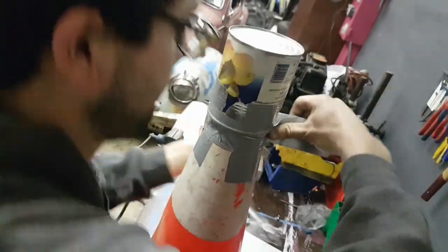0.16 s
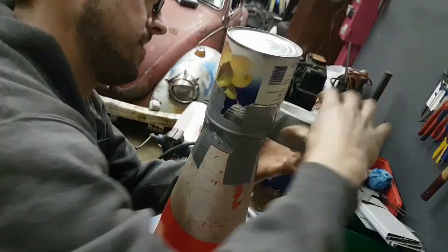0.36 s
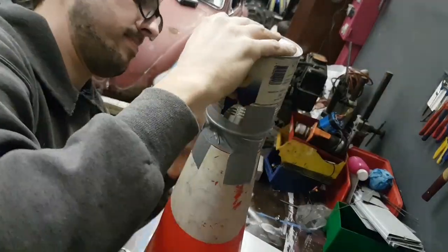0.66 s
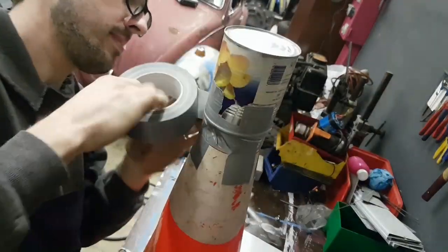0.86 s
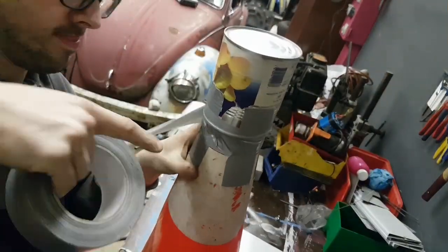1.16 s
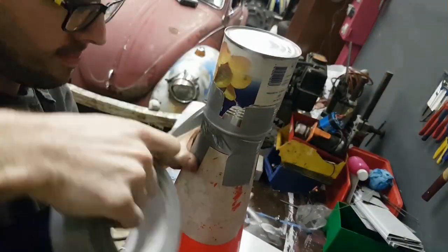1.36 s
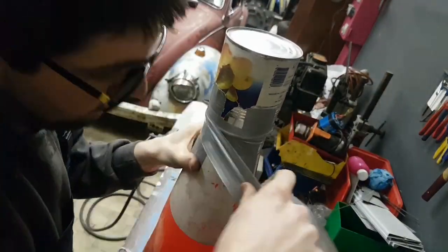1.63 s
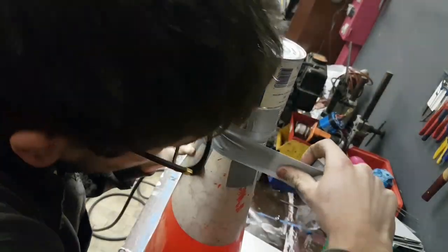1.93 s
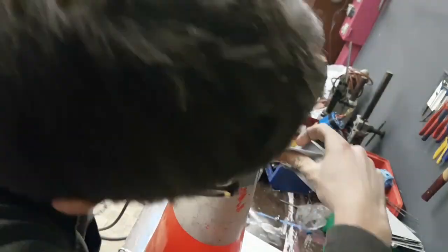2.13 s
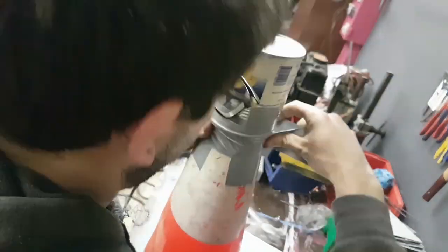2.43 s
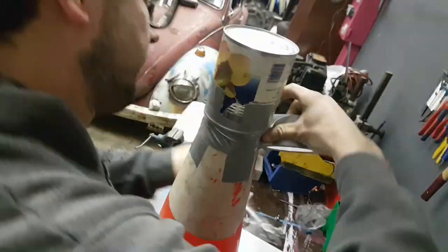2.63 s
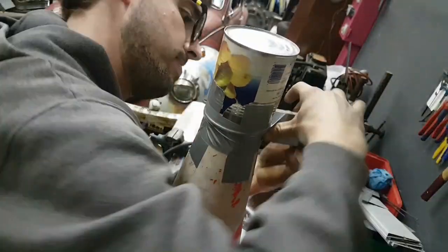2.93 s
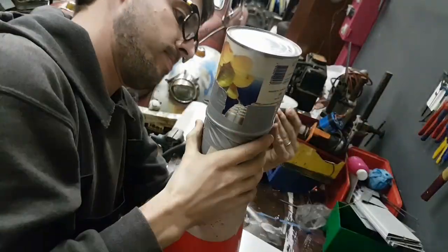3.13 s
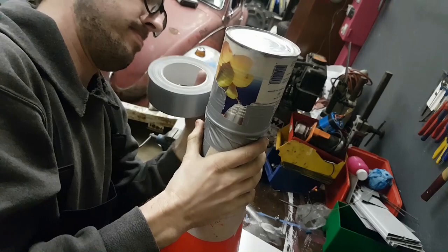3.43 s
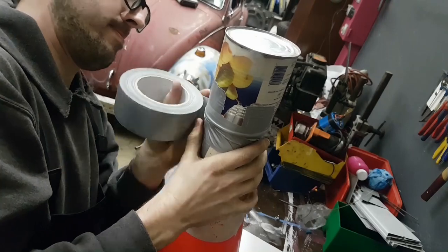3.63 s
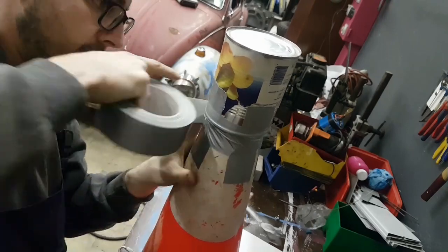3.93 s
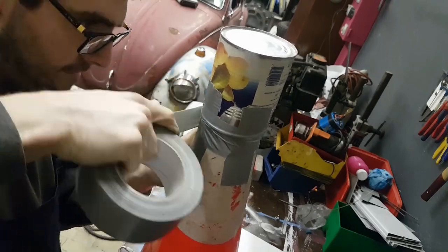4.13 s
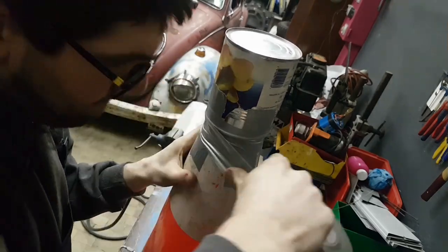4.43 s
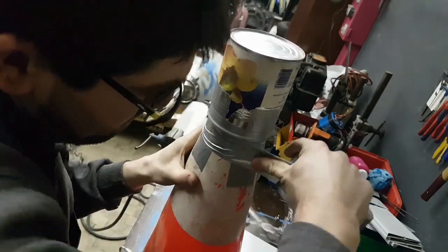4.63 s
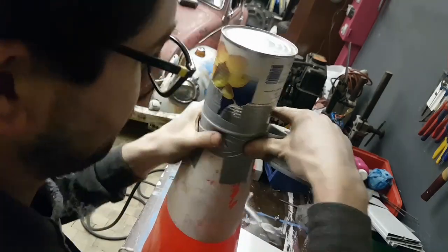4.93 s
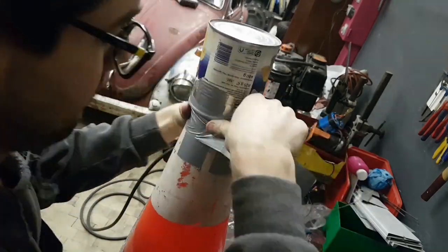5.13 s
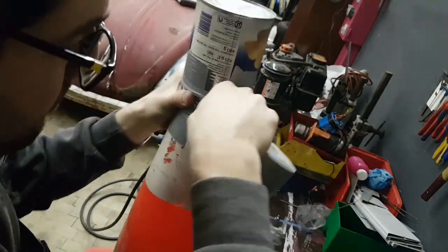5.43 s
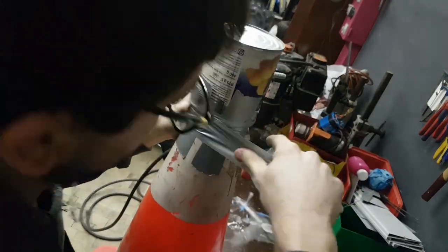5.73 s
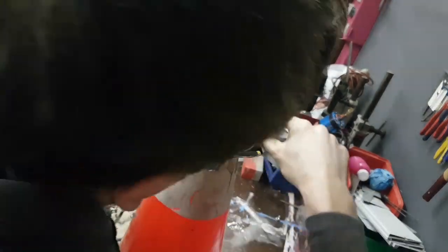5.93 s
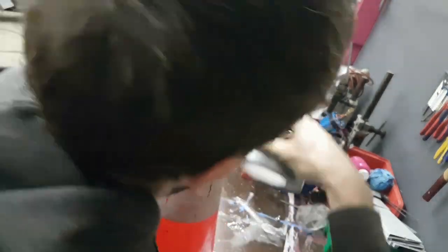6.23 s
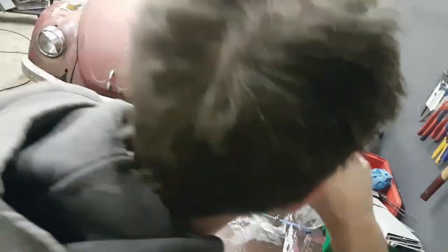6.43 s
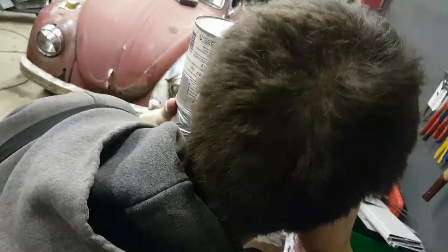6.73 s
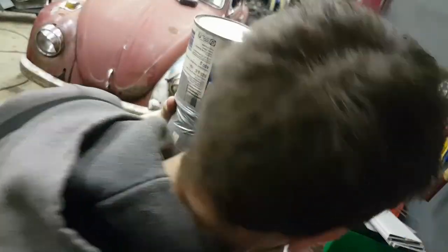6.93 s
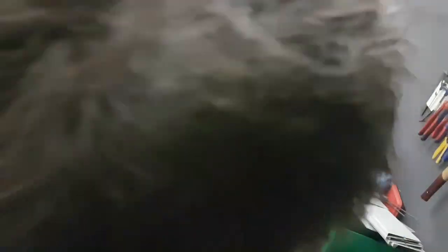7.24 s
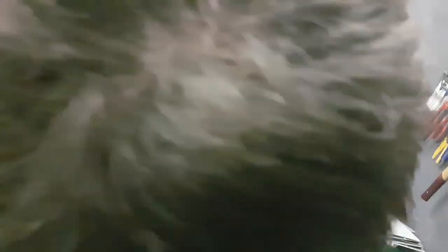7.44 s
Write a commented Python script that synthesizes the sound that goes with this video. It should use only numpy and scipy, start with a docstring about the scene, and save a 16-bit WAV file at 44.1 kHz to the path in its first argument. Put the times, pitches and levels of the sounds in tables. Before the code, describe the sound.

In a quiet workshop, sticky tape lets go in jerky bursts, some brief ticks, some zipping rips that slide in pitch, with a slightly hollow ring from the cone and can. Hands brush the tape between pulls. Low thumps follow near the middle and late on. Heard close at two microphones, dry, with little echo and soft low hum.

```python
"""A quiet workshop hums while cloth tape is pulled off its roll in short rips and wound round a can on a plastic cone.
The glue lets go in uneven slips, which ring the free span of tape, the roll and the hollow cone and can.
Large single slips snap, fine threads of glue crackle, sleeves and fingers rub on the tape,
and dull knocks land on the cone and its stand. All of it is heard close up at two microphones."""
import sys
import numpy as np
from scipy import signal
from scipy.io import wavfile
from scipy.ndimage import uniform_filter1d

SR = 44100
rng = np.random.default_rng(int(sys.argv[2]) if len(sys.argv) > 2 else 0)


def waveform_to_disk(signal):
    """Save audio, clipped to [-1, 1], as 16-bit WAV at the path in sys.argv[1]."""
    frames = np.transpose(np.atleast_2d(signal))
    scaled = np.clip(frames, -1, 1) * 32767
    samples = np.round(scaled).astype(np.int16)
    wavfile.write(sys.argv[1], SR, samples)


N = 334278

# low modes of the stand: (pitch [Hz], level [dB])
STAND = [(80, 8.5), (112, 5.5), (212, 6)]
# modes of the hollow cone and can: (pitch [Hz], width [Hz], level [dB])
CONE = [(345.7, 45, -1.5), (482, 250, -11.5), (641, 70, -8), (851, 94, -14)]
# colour of the crackling glue: (frequency [Hz], level per Hz [dB])
CRACKLE = [(1470, -28.5), (2500, -2), (3950, -3.5), (5590, -7), (7860, -14), (9250, -28), (11800, -14),
           (15900, -22)]


def gain_of(db):
    """Turns decibels into amplitude."""
    return 10 ** (np.asarray(db) / 20)


def evened(x):
    """Scales a sound to rms 1."""
    return x / np.sqrt(np.mean(x ** 2) + 1e-20)


def read(points, hz):
    """Reads a spectrum at the frequencies hz, with straight lines on a log-frequency axis."""
    f, value = np.transpose(points)
    return np.interp(np.log(hz + 1), np.log(f + 1), value)


def along(rows):
    """Draws each column of a time table as a curve with a value at every sample."""
    s, *columns = np.transpose(rows)
    return [np.interp(np.arange(N) / SR, s, column) for column in columns]


def add(mix, s, sound):
    """Mixes a sound in at time s."""
    part = mix[round(s * SR):][:len(sound)]
    part += sound[:len(part)]


def resonate(x, hz, width):
    """Resonance of gain 1: shifts the pitch hz down to zero, smooths, and shifts back."""
    turn = np.exp(2j * np.pi * np.cumsum(hz * np.ones(len(x))) / SR)
    r = np.exp(-np.pi * width / SR)
    return 2 * (turn * signal.lfilter([1 - r], [1, -r], x / turn)).real


def resonate_twice(x, hz, width):
    """Two equal resonances in a row, for steeper sides."""
    return resonate(resonate(x, hz, width), hz, width)


def coloured(x, points):
    """Filters with the given dB spectrum, looking only backwards and with the least delay."""
    level_db = np.maximum(read(points, abs(np.fft.fftfreq(4096, 1 / SR))), -100)
    log_gain = np.log(gain_of(level_db))
    # the Hilbert transform gives the phase of least delay
    taps = np.fft.ifft(np.exp(np.conj(signal.hilbert(log_gain)))).real[:2048]
    return signal.oaconvolve(x, taps)[:len(x)]


def slips(per_s, spread_db):
    """Random one-way slips of the glue, most of them small and a few large."""
    size_db = spread_db * np.minimum(rng.exponential(1, N), 3)
    happens = rng.random(N) < per_s / SR
    return -gain_of(size_db) * happens


def wander(samples):
    """Smooth random curve of rms 1 that changes over so many samples."""
    return evened(uniform_filter1d(uniform_filter1d(rng.standard_normal(N), size=samples), size=samples))


def hum():
    """Workshop hum: random short-time spectra with drifting patches, plus a thin high whine."""
    # (frequency [Hz], level per Hz [dB]), before the overall level
    hum_colour = [(12, -41.5), (20, -19), (101, 3), (203, -6.5), (254, -11.5), (336, -12.5), (778, -26.5),
                  (1480, -33.5), (2310, -31.5), (8840, -51), (14200, -43), (15900, -47)]
    # left-right likeness: (frequency [Hz], likeness [-1 to 1])
    likeness = [(60, 1), (380, 0.86), (2380, -0.19), (15000, -0.065)]
    # pitch of the whine: (time [s], pitch [Hz])
    whine_pitch = [(1.85, 13780), (1.9, 14500), (2.05, 14000), (2.6, 13850)]
    hum_db, whine_db = -49.5, -84

    frames, hz = N // 256 + 5, np.fft.rfftfreq(1024, 1 / SR)
    a, b, c, d, patches = rng.standard_normal((frames, 513, 5)).T
    patches = evened(uniform_filter1d(uniform_filter1d(patches, size=10, axis=0), size=14, axis=1))
    same = np.clip(read(likeness, hz), -1, 1)[:, None]
    left = a + 1j * b
    right = same * left + np.sqrt(1 - same ** 2) * (c + 1j * d)
    spectra = np.array([left, right]) * gain_of(read(hum_colour, hz)[:, None] + 1.2 * patches)
    air = signal.istft(spectra, nperseg=1024, noverlap=768)[1][:, :N]

    whine = resonate_twice(rng.standard_normal(N), along(whine_pitch)[0], width=10)
    return gain_of(hum_db) * evened(air) + gain_of(whine_db) * evened(whine)


def tail(start_s):
    """Room echo of energy 1: sparse taps of random sign, each band dying at its own speed."""
    # (frequency [Hz], time to fall 60 dB [s])
    decays = [(200, 0.41), (600, 0.19), (2000, 0.23), (6000, .25), (12000, 0.18)]
    taps = np.zeros((2, SR // 2))
    # one tap at a random place in every 20 samples
    at = np.arange(0, SR // 2 - 20, 20) + rng.integers(0, 20, (2, (SR // 2 - 1) // 20))
    np.put_along_axis(taps, at, rng.choice([-1., 1.], at.shape), 1)
    hz, t, spectra = signal.stft(taps, SR, nperseg=128)
    fading = spectra * gain_of(-60 * t / read(decays, hz)[:, None])
    out = signal.istft(fading, SR, nperseg=128)[1]
    return np.pad(out / np.linalg.norm(out[0]), ((0, 0), (round(start_s * SR), 0)))


def scattered(near):
    """Two short random echoes off hands and roll, blended in turn: one microphone gains what the other loses."""
    # (frequency [Hz], level [dB])
    scatter_colour = [(60, -30), (400, -14), (1000, -6), (3000, -3), (10000, 0)]
    t = np.arange(600) / SR
    echoes = rng.standard_normal((2, len(t))) * gain_of(-60 * t / .007)
    echoes = echoes / np.linalg.norm(echoes, axis=1)[:, None]
    a, b = signal.oaconvolve(near[None], echoes, axes=1)[:, :N]
    turn = 2 * np.pi * 17 * np.arange(N) / SR  # 17 turns a second
    return coloured(a * np.cos(turn) + b * np.sin(turn), scatter_colour)


def rubbing():
    """Sleeves and fingers on the tape: dense uneven grit with sparse tiny ticks of glue."""
    # (time [s], level [dB], brightest pitch [Hz])
    rub_rows = [(0, -60.5, 2033), (.17, -62.5, 1760), (.25, -68, 2506), (1.3, -58.5, 2000),
                (1.95, -78, 4960), (2.17, -68, 5450), (2.27, -73, 4000), (3.7, -71, 2859),
                (3.93, -54.5, 1500), (4.6, -70, 2604), (4.92, -81.5, 997), (4.99, -63, 1210),
                (5.22, -64.5, 1577), (5.33, -65.5, 2094), (6.03, -108, 3170), (6.1, -65, 2496),
                (7.58, -79, 1970)]
    # (frequency [Hz], level per Hz [dB])
    rub_colour = [(410, -43), (700, 0.5), (1520, -12), (5950, -22.5), (8810, -30), (12000, -24),
                  (15600, -63), (22000, -120)]
    level_db, hz = along(rub_rows)
    grit = evened(rng.standard_normal(N) * gain_of(4.7 * wander(300)))
    ticks = grit + 1.7 * evened(slips(per_s=200, spread_db=5.0))
    bright = evened(resonate_twice(ticks, hz, width=1800))
    return gain_of(level_db) * evened(evened(coloured(grit, rub_colour)) + .7 * bright)


def knocks():
    """Dull blows on the cone and its stand: low modes that start over a few milliseconds."""
    # (time [s], level [dB], share of the upper mode [dB], time to fall 60 dB [s])
    knock_rows = [(0.509, -27, -15, 0.11), (1.036, -29, 9, 0.074), (2.672, -38, -6, 0.18),
                  (3.884, -32.5, -5, 0.1), (5.039, -28.5, 1.5, 0.095), (5.116, -28, -5, 0.11),
                  (5.519, -20.5, 1, 0.15), (5.556, -14, -2.5, 0.079), (6.816, -18, -5, 0.084),
                  (7.05, -16, 8.5, 0.08), (7.102, -15.5, 5.5, 0.067), (7.551, -33, -22, 0.23)]
    out, t = np.zeros(N), np.arange(SR // 3) / SR
    soft_start = 1 - np.exp(-t / 0.009)
    low, middle, upper = [gain_of(level_db) * np.sin(2 * np.pi * hz * t) for hz, level_db in STAND]
    for s, db, upper_db, t60 in knock_rows:
        ring = low + middle + gain_of(upper_db - 60 * t / 0.13) * upper  # the upper mode dies sooner
        add(out, s, gain_of(db - 60 * t / t60) * ring * soft_start)
    return out


def snaps():
    """Large single slips: a swing or two of the span, a sharp click, a dying fizz and a tap on the cone."""
    # (time [s], level before mixing [dB], ring pitch [Hz])
    snap_rows = [(0.1796, -33, 5000), (0.5118, -9.5, 666), (0.5761, -5.5, 1940), (0.661, -16, 1200),
                 (0.956, -13.5, 2223), (1.0406, -6.5, 830), (1.0563, -5.5, 878.6), (1.2095, -11, 891.6),
                 (1.219, -7, 1030), (1.5733, -38, 7000), (1.615, -50.5, 7040), (1.655, -39, 7000),
                 (1.7253, -38, 3660), (1.8119, -1.5, 1350), (2.0131, -42, 2630), (2.056, -46, 5000),
                 (2.162, -40, 5640), (2.222, -42, 5100), (2.531, -41, 4960), (2.6593, -24, 3413),
                 (2.788, -23.5, 6570), (2.812, -25, 4070), (3.008, -22.5, 2000), (3.1829, -15, 710),
                 (3.2494, -3, 2190), (3.2687, 2, 2178), (3.2881, -5.5, 2061), (3.386, -30, 6000),
                 (3.802, -39.5, 2000), (4.0115, -7.5, 1250), (4.035, -11.5, 925), (4.059, -7, 1150),
                 (4.145, -34, 885), (4.282, -11, 973), (4.3979, -7.5, 4073), (5.003, -19.5, 4550),
                 (5.1138, -10.5, 2138), (5.3586, -18.5, 2425), (5.392, -25, 4860), (5.4331, -31.5, 2350),
                 (5.477, -13.5, 2640), (5.5109, -13, 2430), (5.53, -4, 2300), (5.6063, -1, 2414),
                 (5.6355, -7, 1910), (5.7265, -11.5, 4070), (5.807, -7.5, 2470), (5.9436, -21, 3300),
                 (5.9503, -14, 3565), (6.0268, -29.5, 3225), (6.2227, -20, 1830), (6.2655, -10, 2360),
                 (6.275, -7, 2071), (6.302, -15, 2303), (6.3346, -8, 2528), (6.3474, -13, 2500),
                 (6.398, -18, 2190), (6.4404, -12.5, 3267), (6.459, -11, 3251), (6.4659, -3, 2100),
                 (6.4825, -14, 3200), (6.666, -45.5, 2210), (6.708, -42, 3000), (6.9604, -16.5, 7340),
                 (7.125, -19.5, 3000), (7.3696, -22.5, 2450), (7.466, -47, 3960)]
    out, t = np.zeros(N), np.arange(2500) / SR
    noises = rng.standard_normal((len(snap_rows), len(t)))
    tap = sum(gain_of(level - 140 * width * t) * np.sin(2 * np.pi * f * t) for f, width, level in CONE)
    for (s, db, hz), grit in zip(snap_rows, noises):
        fade = gain_of(-13. * hz * t)  # 13 dB lost each swing
        ring = -np.sin(2 * np.pi * hz * t) * fade * np.tanh(6.0 * hz * t)
        sharp = grit * gain_of(-60 * t / 0.0036)
        fizz = uniform_filter1d(grit, size=4) * gain_of(-60 * t / 0.068)  # lacks the top treble
        click = coloured(sharp + 0.12 * fizz, CRACKLE)
        add(out, s, gain_of(db) * (ring + 0.26 * click / abs(click).max() - 0.009 * tap))
    return out


def pulls():
    """Peel force, span pitch and shares over time: each pull swells and fades as the free span changes evenly."""
    # one row a pull: (start [s], length [s], swell [s], peel level [dB], fade [dB], span pitch at start [Hz],
    # span pitch at end [Hz], cone share [dB], crackle share before a common lift [dB])
    pull_rows = [ (0.386, .03, 0.0018, -36.5, -15, 2988, 3200, -4, -21),
                 (0.445, 0.015, 0.0015, -42, -25, 4480, 4500, -5, 0),
                 (0.492, .032, .006, -29, -0.5, 800.3, 900, 2, -7.5),
                 (0.525, .047, 0.011, -16.5, -18, 1000, 762.5, -14, -38),
                 (0.576, 0.025, .002, -17.5, -15.5, 766, 620, -2.5, -28),
                 (0.656, 0.044, 0.0069, -20.5, -10, 741, 560, -12, -41),
                 (0.874, 0.024, 0.0028, -45.5, 0.5, 2290, 2120, -5, -3),
                 (0.94, 0.028, .012, -38, -1.5, 2496, 2350, -4, -8),
                 (0.985, 0.15, 0.022, -25.5, -0.5, 2325, 560, -3.5, -26),
                 (1.208, .038, 0.0019, -26.5, -11, 694.3, 820, 1.7, -22),
                 (1.371, 0.019, .015, -40.5, -7, 2400, 2400, 1, -2.5),
                 (1.423, 0.027, .008, -28.5, -14.5, 1580, 1480, 3.5, -1),
                 (1.808, .014, 0.0046, -34.5, -9, 1501, 1520, 8.5, -7),
                 (2.658, 0.047, .003, -48, 1, 1200, 1350, -21, -11),
                 (2.787, 0.036, 0.016, -51.5, -1, 2230, 3600, -17, -9),
                 (3.0, 0.032, 0.0034, -52, -7.5, 3613, 3000, 2.5, 0.5),
                 (3.118, .073, 0.047, -19.5, -8, 3132, 600, -24, -11),
                 (3.249, 0.048, 0.0029, -23, -9, 2440, 1870, -2.7, -15),
                 (3.74, .07, 0.025, -53, -2.5, 1501, 1494, 1.5, -25),
                 (3.853, 0.016, .002, -44, -13, 1346, 1240, -12, -20),
                 (3.877, .034, 0.0031, -42, -12, 1333, 1500, 2.5, -37),
                 (3.95, 0.082, 0.035, -20, -7, 1803, 1100, -22.5, -17),
                 (4.033, 0.039, 0.0019, -25.5, -17.5, 624.2, 800, 7.5, -4),
                 (4.133, 0.035, 0.007, -28, -12.5, 800, 980, 3.5, -19),
                 (4.271, .011, .002, -32, -15, 3633, 3770, -11, -7.5),
                 (4.282, 0.042, .002, -22, -11, 904, 1095, 9, -5),
                 (4.386, 0.031, 0.014, -25.5, -12.5, 2797, 3100, -8.5, -1),
                 (4.978, .165, 0.032, -39.5, -2, 1002, 1296, -4, -6),
                 (5.476, 0.044, .002, -28.5, -13, 2560, 2360, -11.5, -15),
                 (5.527, .039, 0.0016, -26, -11, 2317, 600, 3.5, -41),
                 (5.601, 0.071, .014, -23.5, -3, 2601, 1200, -17, -16),
                 (5.726, 0.022, .002, -42, -9.5, 4000, 3200, -9, 1),
                 (5.792, 0.029, 0.014, -36.5, -16, 2085, 2300, -18, 4.2),
                 (5.94, 0.025, .004, -58.5, -9, 2840, 3500, -28, 14.5),
                 (6.16, 0.094, 0.066, -43, -7.5, 1264, 1920, -19, -8),
                 (6.259, 0.033, 0.011, -26.5, -10, 2127, 2150, -20, -5.5),
                 (6.302, .05, .002, -24, -4, 2155, 2150, -10, -6.5),
                 (6.44, 0.046, 0.0031, -21.5, -5.5, 2810, 3200, -14, -9),
                 (6.547, .022, 0.0049, -47.5, -27, 2955, 2995, -5.5, 1.5),
                 (6.724, .02, 0.0065, -57, -20, 2460, 2505, -10, -2),
                 (6.792, .034, 0.0083, -37, -1.5, 3400, 3000, -9.5, -3.3),
                 (7.047, .022, 0.0058, -30, -10.5, 1075, 1090, -12, -22),
                 (7.1, 0.033, 0.0029, -38.5, -23, 1005, 1190, 3.5, -8.5),
                 (7.29, 0.027, 0.017, -47.5, -9, 2137, 1910, -2, -4),
                 (7.538, 0.029, 0.0036, -42.5, -4, 644, 640, -6, -8.5), ]
    # a slow pull starts this far below its peak; pulls that swell quicker than swell_s start nearer to it
    swell_db, swell_s = -13, .03
    fade_bend = 1.015  # above 1 the pull holds first and gives way late

    force, spans = np.zeros(N), []
    for start, length, swell, db, fade_db, from_hz, to_hz, *share_db in pull_rows:
        t = np.arange(0, length, 1 / SR)
        rise = swell_db * min(swell / swell_s, 1) * np.clip(1 - t / swell, 0, 1)
        fall = fade_db * np.clip((t - swell) / max(length - swell, 1 / SR), 0, 1) ** fade_bend
        add(force, start, gain_of(db + rise + fall))
        # the time of one swing grows with the span's length
        spans += [(start, 1 / from_hz, *share_db), (start + length, 1 / to_hz, *share_db)]
    swing_s, cone_db, crackle_db = along(sorted(spans))
    return force, 1 / swing_s, cone_db, crackle_db


def hollow(x):
    """Hollow cone and can: each mode rings, then a wider resonance at the same pitch trims it."""
    return sum(gain_of(db) * resonate(resonate(x, hz, width), hz, 510) for hz, width, db in CONE)


def rips():
    """Stick and slip at the peel line rings the tape span, roll and cone; fine threads of glue crackle."""
    roll_hz = 1630  # broad ring of the tape roll
    force, span_hz, cone_db, crackle_db = pulls()
    pull = signal.lfilter([.012], [1, -.988], force)  # softens the force over about 2 ms
    span_hz = uniform_filter1d(span_hz, size=200)

    # the swinging span tugs the glue loose about once a swing, in surges a few milliseconds long
    swings = np.floor(np.cumsum(span_hz * gain_of(2.5 * wander(40))) / SR)
    surges = gain_of(1.2 * wander(70))
    tugs = -np.diff(swings, prepend=0)
    coarse = evened(tugs * surges * gain_of(2.84 * rng.standard_normal(N)))
    fine = evened(slips(per_s=6000, spread_db=3.0) * (7.2 + surges))
    drive = coarse + 0.46 * fine + 0.85 * evened(slips(per_s=300, spread_db=1.0))
    drive = drive - uniform_filter1d(drive, size=300)  # the steady pull makes no sound

    span = resonate_twice(drive, span_hz, 780)
    span = span + 0.57 * resonate_twice(drive, roll_hz, 2570)
    span = span + 0.35 * resonate_twice(drive, 0.53 * span_hz, 840)
    cone = hollow(drive * pull * gain_of(cone_db)) / np.std(hollow(drive))
    crackle = evened(coloured(fine, CRACKLE)) * gain_of(crackle_db + 3.0)
    sway = resonate_twice(wander(30) * pull, STAND[0][0], 32)  # the pull rocks the stand
    return pull * (gain_of(1.5) * evened(span) + crackle) + cone + gain_of(-2.5) * sway


def scene():
    """Near sounds reach two microphones directly, scattered by hands and roll, and back from the walls."""
    # where the roll is: (time [s], left minus right [dB])
    roll_place = [(0, -1), (2, -1), (4.4, 1.5), (5.9, -1), (6.2, -1.5), (7.58, -3.5)]
    near = rips() + gain_of(0.5) * snaps() + rubbing()
    side = scattered(near)
    place = gain_of(along(roll_place)[0] / 2)
    low = knocks()
    direct = np.array([(near + side) * place, (near - side) / place]) + low
    walls = signal.fftconvolve((near + low)[None], tail(start_s=.006), axes=1)[:, :N]
    # the bass echo is nearly alike at both microphones
    apart = coloured(walls[0] - walls[1], [(60, -20), (500, -8), (2000, -6)])
    return direct + gain_of(-10.5) * (walls.mean(0) + [apart, -apart]) + hum()


def record(dry):
    """The two microphones differ in tone, most in the treble; then the highest treble is cut."""
    # (frequency [Hz], left minus right [dB])
    tone_gap = [(60, -2), (600, 1), (4000, 1), (9000, 4.5), (14000, 8)]
    edge_hz = 15850
    # each side takes half of the gap
    ports = np.array([coloured(x, np.multiply(tone_gap, [1, sign / 2])) for x, sign in zip(dry, (1, -1))])
    cut = signal.firwin(511, edge_hz, window=("kaiser", 9), fs=SR)
    return signal.oaconvolve(ports, cut[None], "same")


dry = scene()
out = record(dry)
waveform_to_disk(out)
```